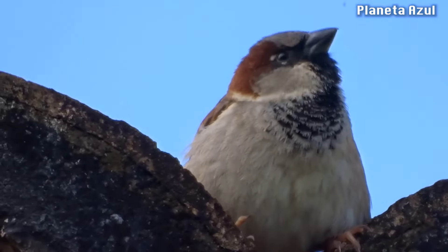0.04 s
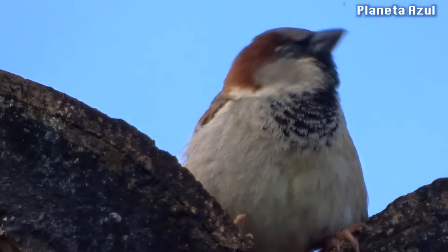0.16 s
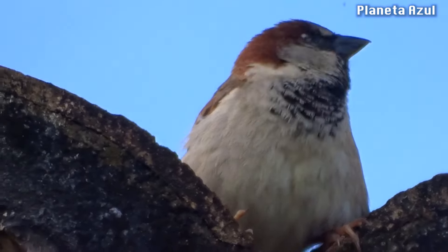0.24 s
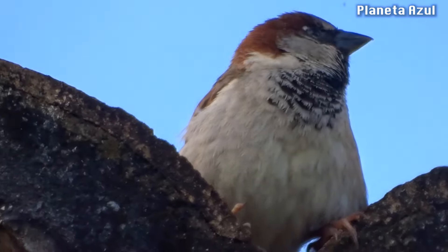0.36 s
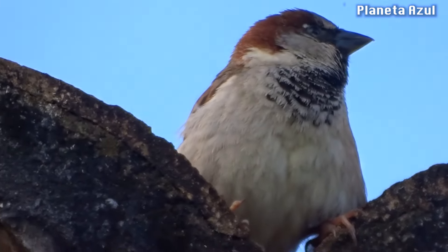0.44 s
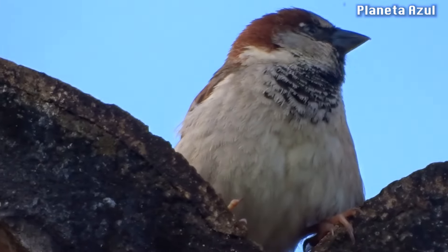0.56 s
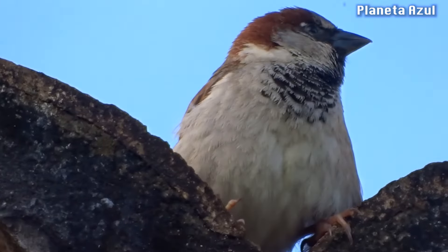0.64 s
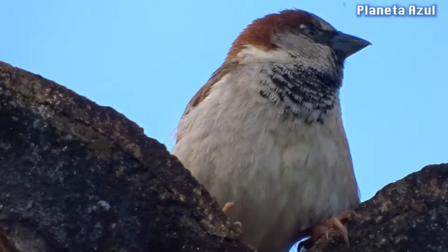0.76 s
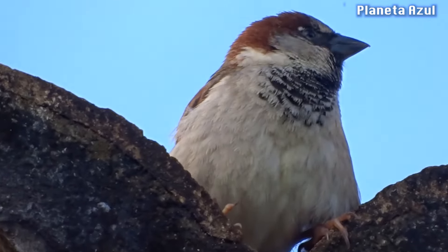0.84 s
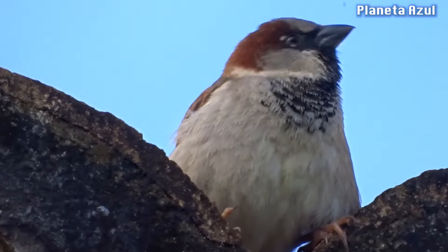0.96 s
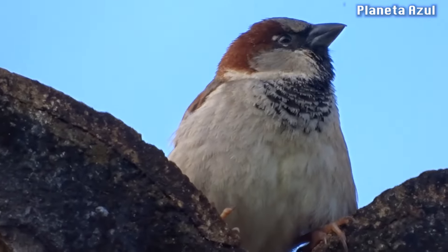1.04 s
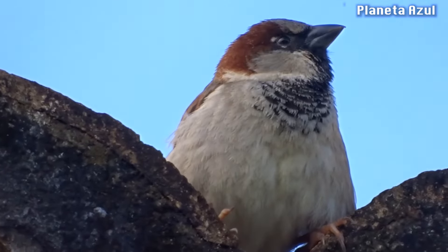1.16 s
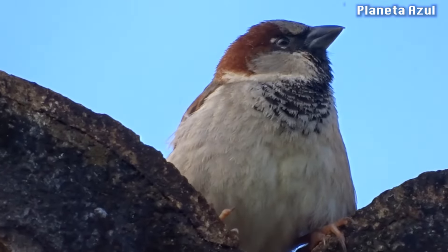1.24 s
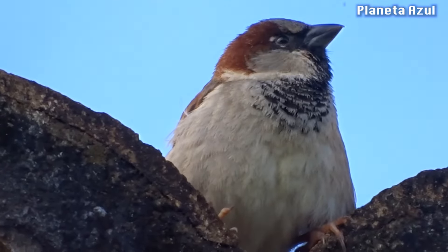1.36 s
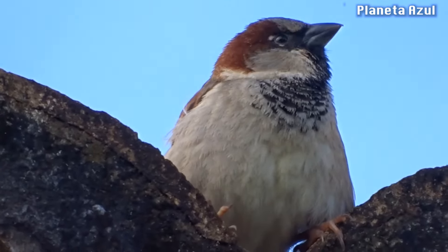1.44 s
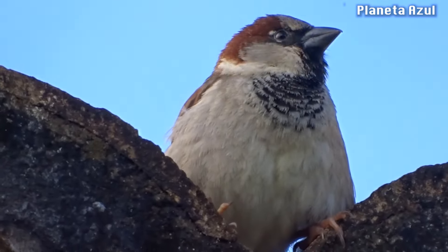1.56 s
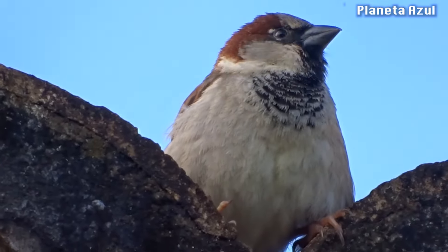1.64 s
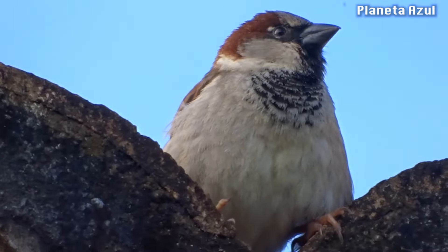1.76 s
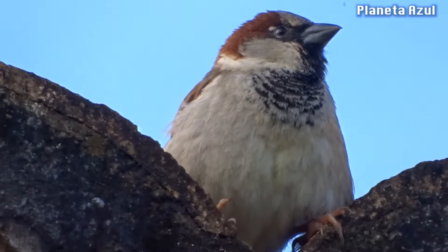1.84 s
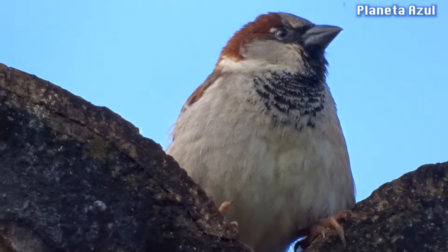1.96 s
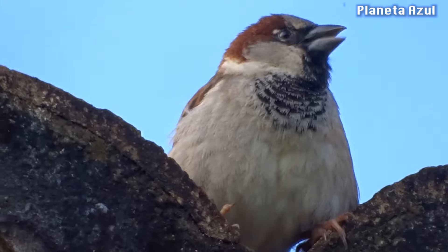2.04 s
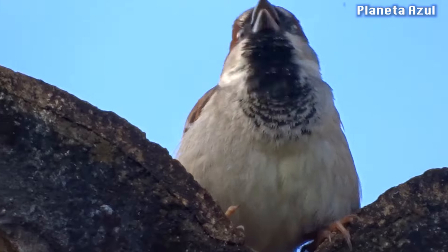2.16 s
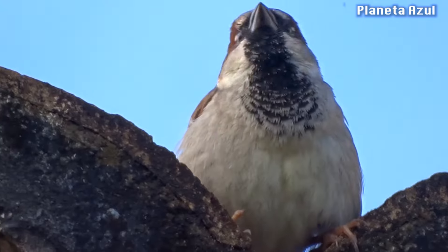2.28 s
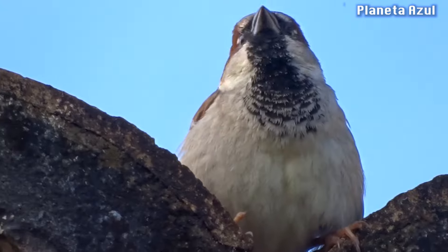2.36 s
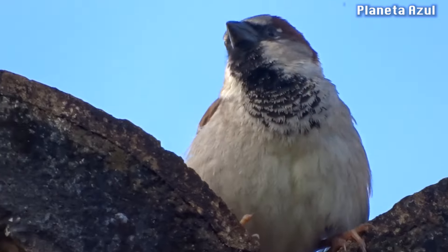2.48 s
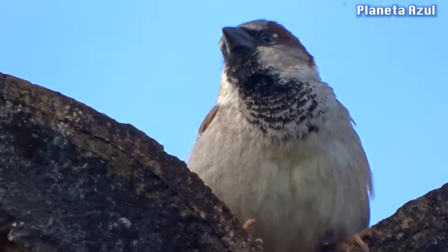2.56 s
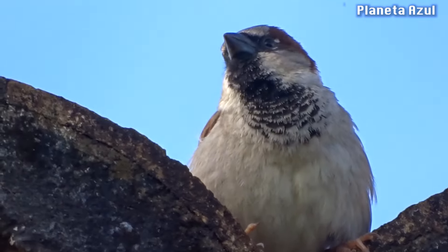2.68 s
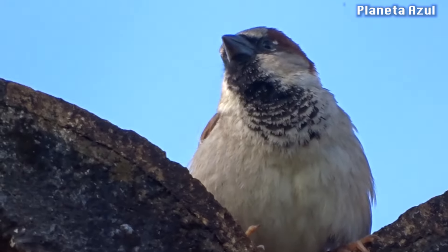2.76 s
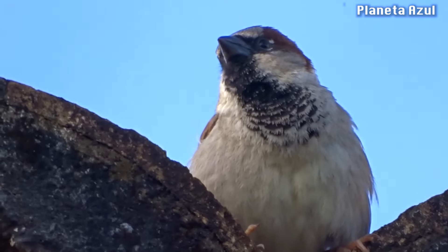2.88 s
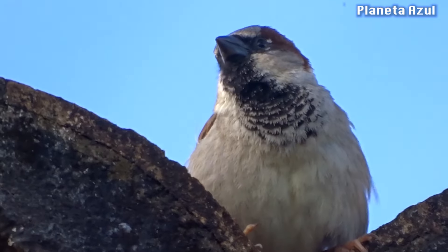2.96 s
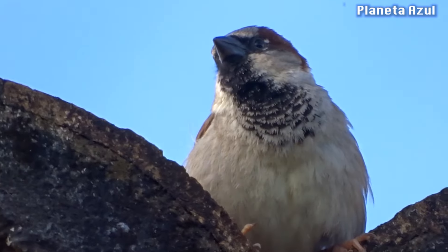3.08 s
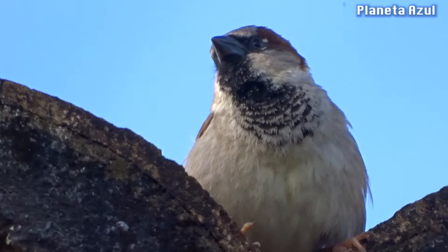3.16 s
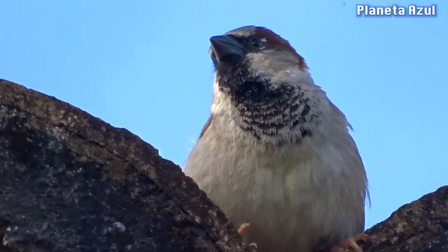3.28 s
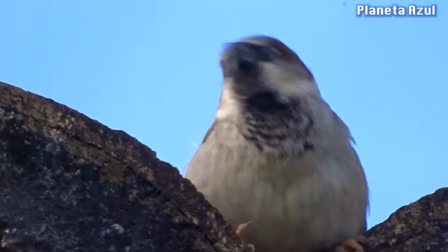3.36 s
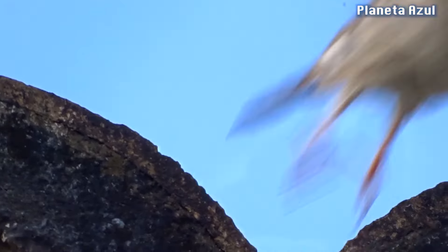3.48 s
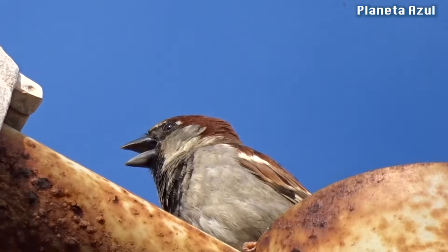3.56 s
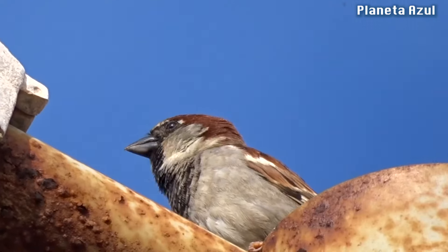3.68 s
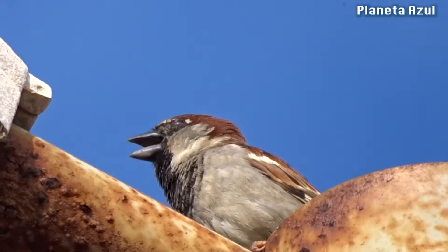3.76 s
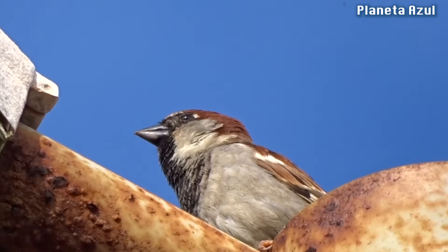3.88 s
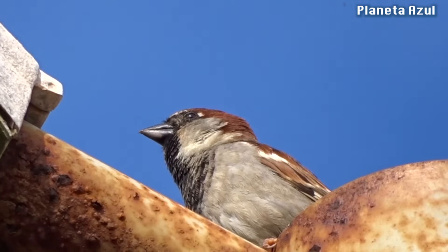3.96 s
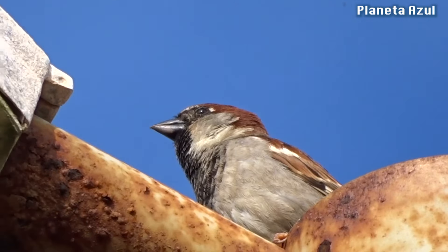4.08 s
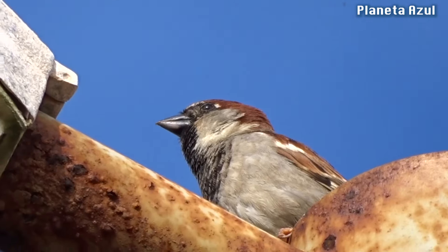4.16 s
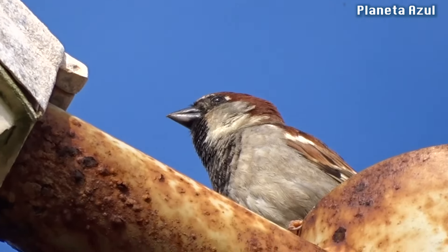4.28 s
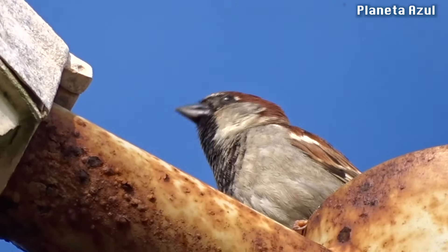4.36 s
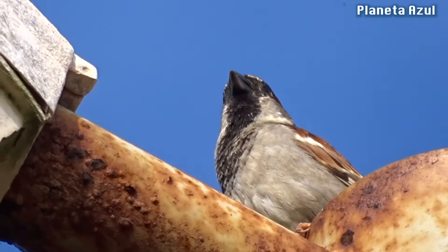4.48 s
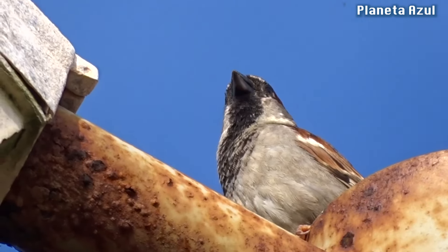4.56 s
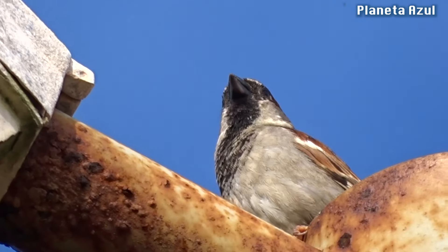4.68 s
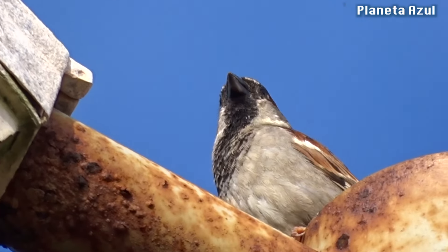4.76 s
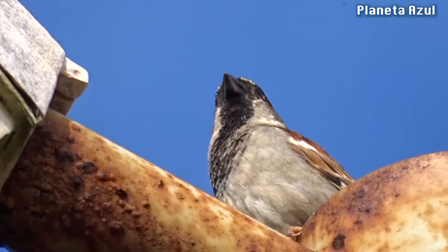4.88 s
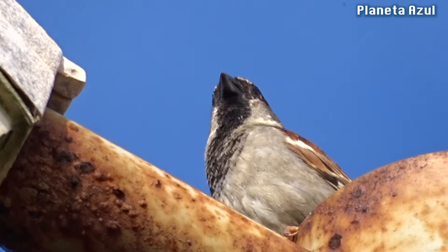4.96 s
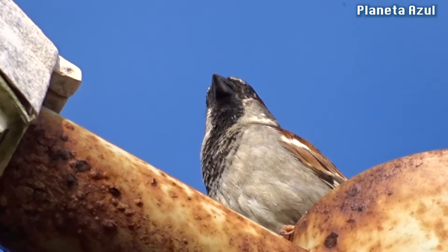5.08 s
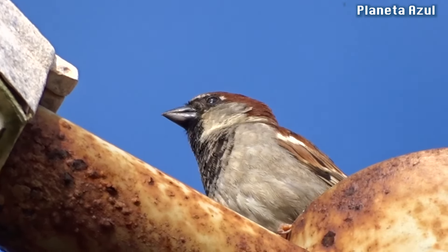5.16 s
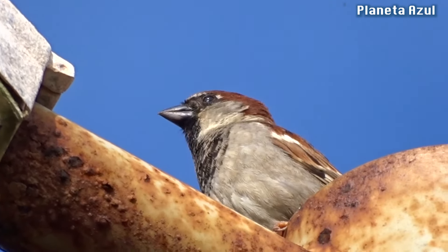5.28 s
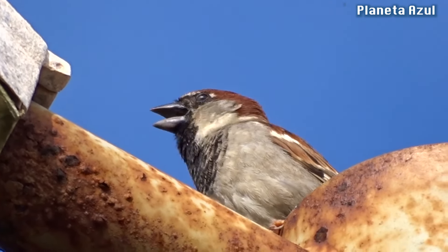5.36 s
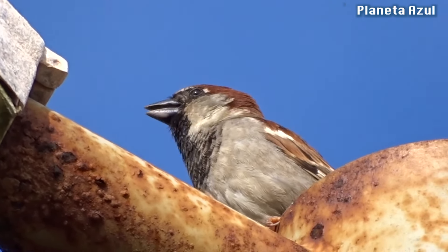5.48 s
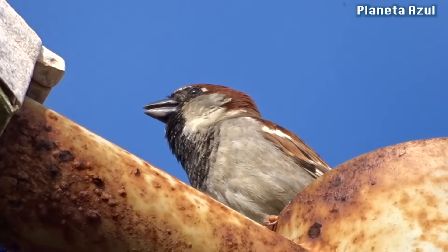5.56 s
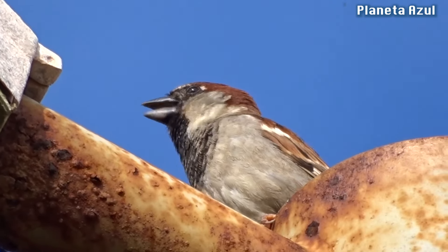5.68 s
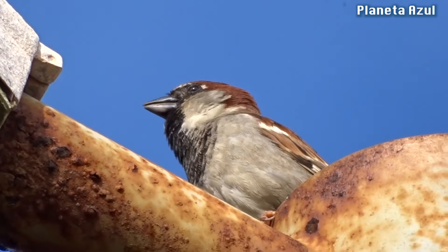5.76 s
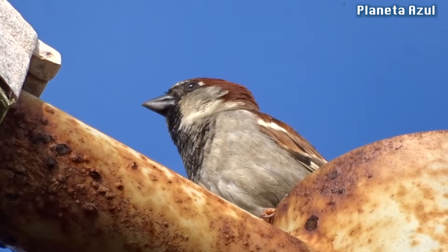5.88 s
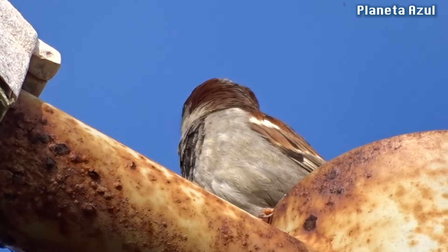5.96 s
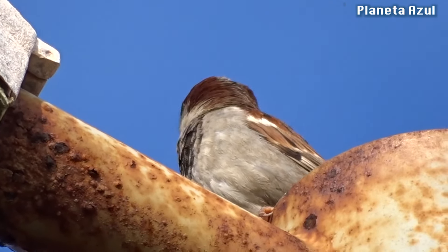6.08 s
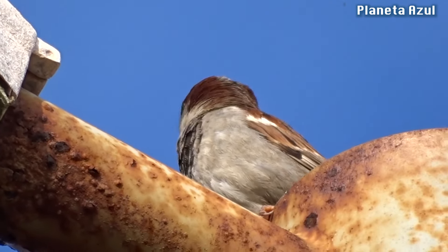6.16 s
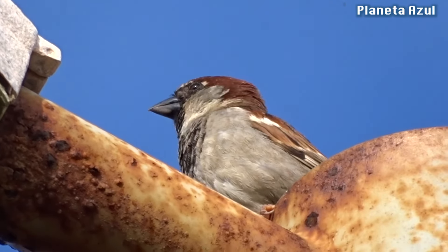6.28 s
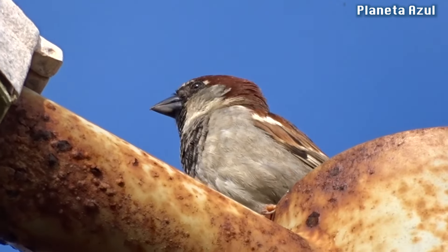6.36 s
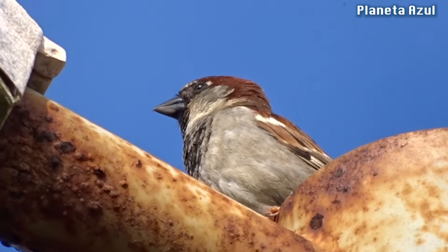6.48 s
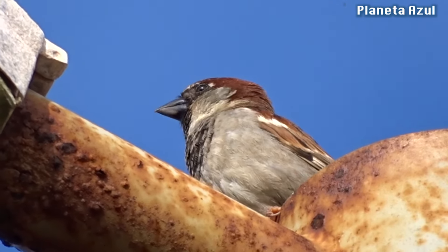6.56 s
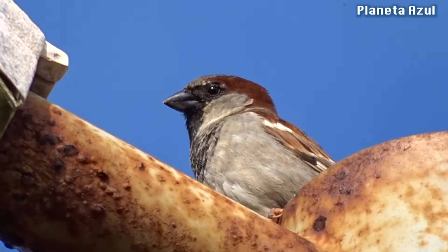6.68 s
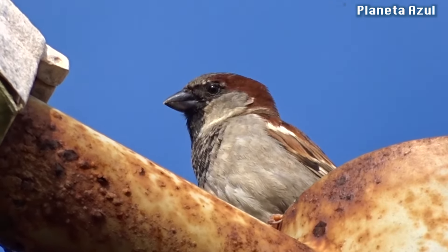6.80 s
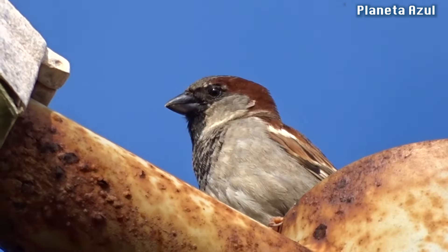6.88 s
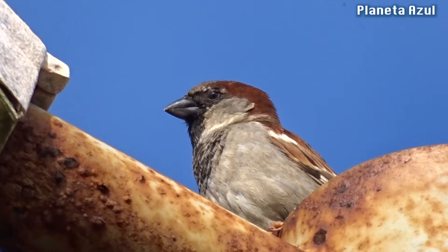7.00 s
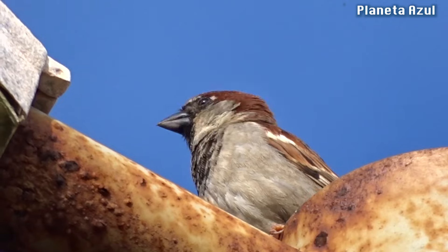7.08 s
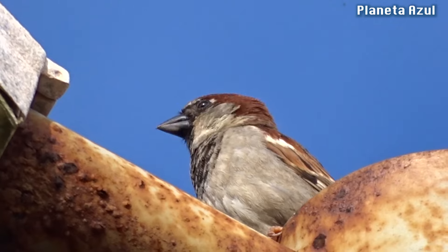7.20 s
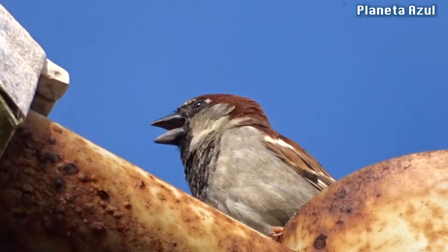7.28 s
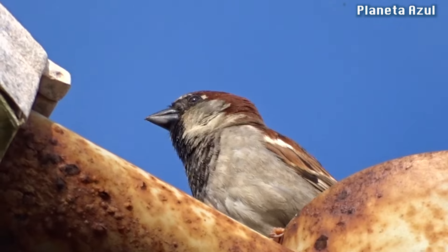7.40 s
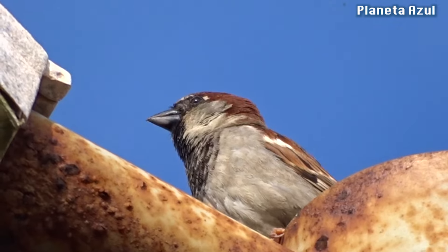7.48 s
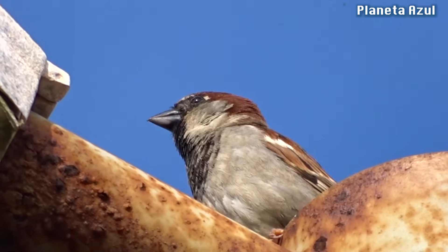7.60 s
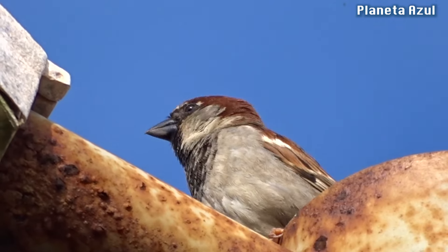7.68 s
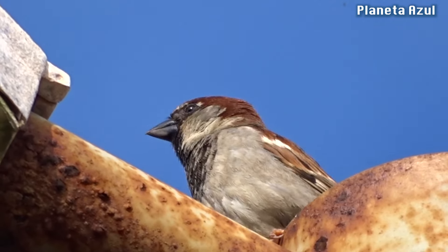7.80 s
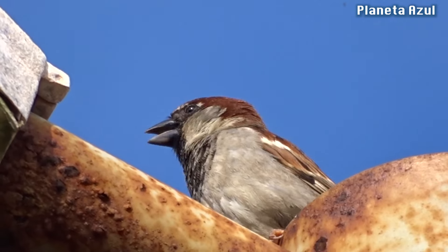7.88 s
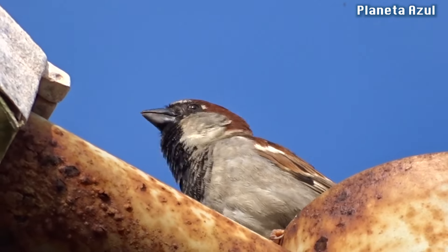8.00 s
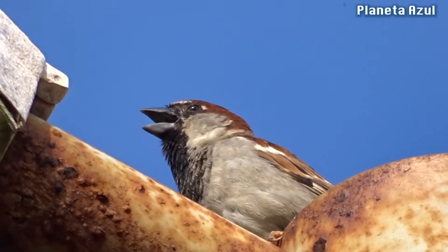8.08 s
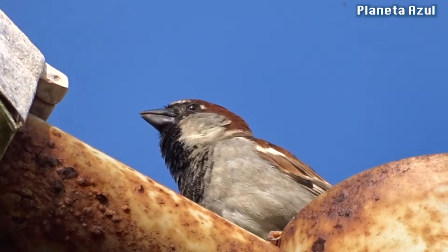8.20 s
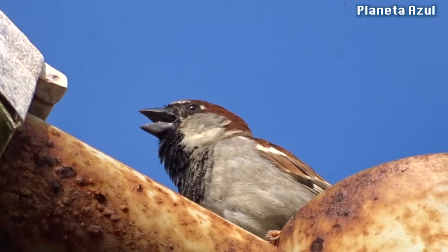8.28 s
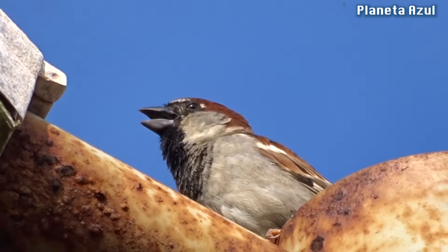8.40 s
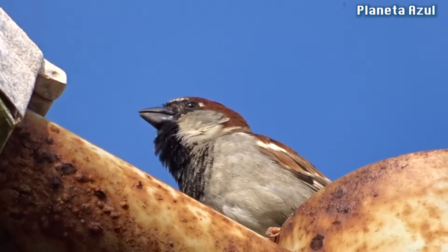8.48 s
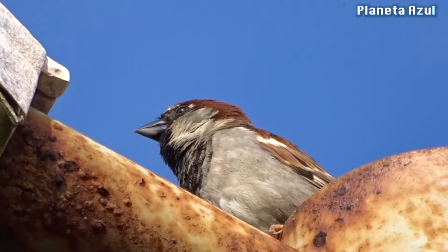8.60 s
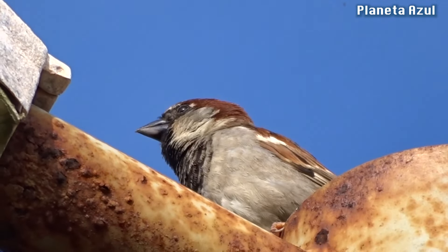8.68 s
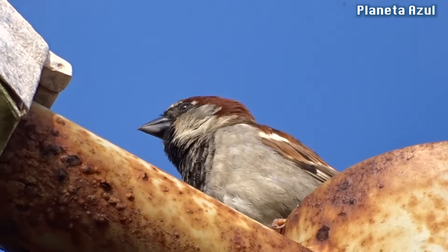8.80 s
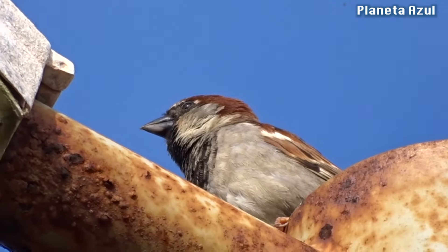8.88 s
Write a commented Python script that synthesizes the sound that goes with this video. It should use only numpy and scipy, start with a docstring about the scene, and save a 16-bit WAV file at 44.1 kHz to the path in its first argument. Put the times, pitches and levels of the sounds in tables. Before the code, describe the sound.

From 0 to 3.5 seconds, a busy sparrow flock calls outdoors among reflecting walls: short, sharp, high chirps, arched slurs and double chirrups over fine treble chatter. Clusters come early, around 1 second, and most loudly near 2.2 seconds, with sparser calls between. Low wind puffs bump the microphone, and distant traffic rumbles softly. At about 3.55 seconds the place abruptly changes to a quieter roof. Two raspy scolds open it while a songbird's fast rising trill smooths into a whistle by 4 seconds. Three pairs of steeply falling whistles follow until 4.8, with a farther two-part chirp at 4, 4.9, 6.1 and 7.8. Three scolds come around 5.4 to 5.8, with strong wind bumps. After a sparse pause, a scold at 7.3, a swelling, breaking warble from 7.5 to 7.9, then rapid scolds, a falling trill and nasal notes to the end near 8.9.

```python
"""A busy sparrow flock calls among echoing walls; at 3.55 s the scene changes to a quieter roof. There sparrows
scold, a farther one repeats a chirp, and a second songbird whistles and trills. Calls are gliding near-sines
with weak overtones and breath noise; scolds are sums of overtones. Traffic and a far flock are banded noise,
wind on the microphone is low noise, echoes are decaying noise."""
import sys
import numpy as np
from scipy import signal
from scipy.fft import rfft, irfft
from scipy.io import wavfile
from scipy.ndimage import uniform_filter1d

SR = 44100
rng = np.random.default_rng(int(sys.argv[2]) if len(sys.argv) > 2 else 0)


def master(y):
    """Save y as 16-bit WAV."""
    cut = np.clip(np.atleast_2d(y).T, -1, 1)
    pcm = np.round(cut * 32767)  # scale
    wavfile.write(sys.argv[1], SR, pcm.astype(np.int16))


N = 394254


def amp(db):
    """Gain of a level in dB."""
    return 10 ** (np.asarray(db) / 20)


def rms_one(x):
    """Signal scaled to rms 1."""
    return x / np.sqrt(np.mean(x ** 2) + 1e-20)


def in_time(rows):
    """A (time_s, value) curve at every sample."""
    return np.interp(np.arange(N) / SR, *np.transpose(rows))


def at_hz(points, hz):
    """A (freq_hz, value) curve read on a log-frequency axis."""
    point_hz, value = np.array(points)[:, 0], np.array(points)[:, 1]
    return np.interp(np.log(hz), np.log(point_hz), value)


def drift(rate_hz):
    """Slow random curve of rms 1: white noise through two equal one-pole lowpasses."""
    pole = np.exp(-2 * np.pi * rate_hz / SR)
    white = rng.standard_normal(N + SR)
    return rms_one(signal.lfilter([1], [1, -2 * pole, pole * pole], white)[SR:])


def panned(x, pan_db):
    """Stereo with a level difference, left minus right in dB."""
    return x * amp(pan_db * np.array([[.5], [-.5]]))


def coloured(x, colour):
    """A sound shaped by a (freq_hz, gain_db) spectrum."""
    return irfft(rfft(x) * amp(at_hz(colour, np.fft.rfftfreq(N, 1 / SR) + 1)), N)


def stereo_pair(mid, side, alike):
    """Two channels of correlation alike, from two independent noises."""
    return np.sqrt(1 + alike) * mid + np.sqrt(1 - alike) * side * np.array([[1], [-1]])


# left-right correlation of background noise: freq_hz, correlation
CORRELATION = [(60, .9), (230, .4), (700, .75), (1700, .5), (3000, .9), (9000, .5)]


def banded_noise(spectrum, patchy_db, rate_hz, pan):
    """Third-octave bands of stereo noise, each with its own level, flicker, correlation and side."""
    out, edges_hz = 0, 25 * 2 ** (np.arange(28) / 3)
    white = rng.standard_normal((2, 2, N))
    for k, (low, high) in enumerate(zip(edges_hz, edges_hz[1:])):
        hz = np.sqrt(low * high)
        if hz < spectrum[0][0]:
            continue
        band = signal.butter(2, [low, high], "band", fs=SR, output="sos")
        mid, side = signal.sosfilt(band, white[k % 2])
        pair = stereo_pair(mid, side, np.clip(at_hz(CORRELATION, hz), -1, 1))
        gain = amp(at_hz(spectrum, hz) + patchy_db * drift(rate_hz))
        out = out + gain * panned(pair, at_hz(pan, hz))
    return rms_one(out)


# traffic spectrum: freq_hz, relative density_db (per Hz)
TRAFFIC_COLOUR = [(25, -18), (90, -3.5), (260, 0.5), (750, -6.5), (1060, -11.5), (1330, -3.5), (1600, -30),
                  (1900, -19), (3800, -19), (6100, -17.5), (11000, -67)]
# traffic side: freq_hz, left_minus_right_db
TRAFFIC_SIDE = [(600, 0.4), (1100, 4), (2000, 1.3), (7000, -3)]
TRAFFIC_DB = -34.5


def traffic():
    """Distant traffic: mostly low banded noise with slow level drift."""
    return amp(TRAFFIC_DB) * banded_noise(TRAFFIC_COLOUR, patchy_db=1.5, rate_hz=0.88, pan=TRAFFIC_SIDE)


# far-flock level: time_s, level_db
BABBLE_LEVEL = [(0.0, -39), (2.09, -43), (5.83, -42.5), (7.07, -53), (8.39, -35), (8.94, -54)]
# far-flock spectrum: freq_hz, relative density_db (per Hz)
BABBLE_SPECTRUM = [(2000, -58), (3000, 15), (4200, 8), (5500, -3), (8000, -2.5), (11000, -5)]


def babble():
    """Far flock blurred to treble noise whose bands flicker."""
    side = [(1000, -2.0), (9000, -1.0)]  # freq_hz, left_minus_right_db
    return amp(in_time(BABBLE_LEVEL)) * banded_noise(BABBLE_SPECTRUM, patchy_db=2.5, rate_hz=18.0, pan=side)


# gusts on the microphone: peak_s, level_db, half_length_s (to 1/e)
WIND_GUSTS = [(0.054, -25, 0.051), (1.994, -27, 0.018), (2.237, -23.5, 0.04), (2.88, -29, 0.043),
              (3.126, -26, 0.02), (5.441, -22, 0.029), (5.563, -22, 0.061), (6.394, -25, 0.011)]
# steady breeze: time_s, level_db
BREEZE_LEVEL = [(0, -46.5), (1.3, -36.5), (3.5, -34.5), (3.6, -85), (4.7, -38), (6.3, -39.5), (6.5, -70),
                (8.94, -46)]


def wind():
    """Lumpy low turbulence on the microphone, mostly shared by both sides; gusts reach higher."""
    t = np.arange(N) / SR
    white = rng.standard_normal((2, N))
    white = white[0] + .28 * white[1] * [[1], [-1]]
    breeze_band = signal.butter(2, [22, 110], "band", fs=SR, output="sos")
    gust_band = signal.butter(2, [60, 330], "band", fs=SR, output="sos")
    breeze = rms_one(signal.sosfilt(breeze_band, white))
    gust = rms_one(signal.sosfilt(gust_band, breeze + 7 * white))
    puffs = sum(amp(level_db) * np.exp(-((t - peak_s) / half_s) ** 2)
                for peak_s, level_db, half_s in WIND_GUSTS)
    lumps = amp(4 * drift(14))
    return lumps * (amp(in_time(BREEZE_LEVEL)) * breeze + puffs * gust)


def walls(x, early_t60_s, late_t60_s, late_db, alike, gap_s):
    """Dense echoes off tiles and walls: a soft onset, a quick bright cluster and a long dull tail."""
    t = np.arange(int(1.2 * SR)) / SR
    mid, side = rng.standard_normal((2, len(t)))
    noise = stereo_pair(mid, side, np.clip(alike, 0, 1))
    dull = signal.sosfilt(signal.butter(2, 6000, fs=SR, output="sos"), noise)
    early = noise * amp(-60 * t / early_t60_s)
    late = dull * amp(late_db - 60 * t / late_t60_s)
    response = (early + late) * np.clip(t / gap_s, 0, 1) ** 2
    response = response / np.sqrt(np.sum(response ** 2) / 2)
    # moving air makes the paths waver by a few samples
    x = np.interp(np.arange(N) + 1.9 * drift(25), np.arange(N), x)
    return signal.fftconvolve(x[None], response, axes=1)[:, :N]


# hiss in a chirp: freq_hz, gain_db
BREATH_SPECTRUM = [(2000, -25), (3000, -2.5), (5000, 11.5), (7000, 13), (11000, -17)]


def whistles(notes, overtones_db, fade_s, rough, jitter, breath_db):
    """Near-sine notes glide along their pitch, with soft ends, flutter, weak overtones and breath."""
    out = np.zeros(N)
    flutter, wobble = 1 + rough * drift(370), 1 + jitter * drift(250)
    breath = amp(breath_db) * rms_one(coloured(rng.standard_normal(N), BREATH_SPECTRUM))
    for note in notes:
        time_s, hz, level_db = np.transpose(note)
        at = np.arange(int((time_s[0] - fade_s) * SR), min(int((time_s[-1] + fade_s) * SR), N))
        t = at / SR
        fade = np.clip(np.minimum(t - t[0], t[-1] - t) / (2 * fade_s), 0, 1)
        # the syrinx rounds the corners of a glide
        pitch = uniform_filter1d(np.interp(t, time_s, hz), size=90) * wobble[at]
        phase = 2 * np.pi * np.cumsum(pitch) / SR
        tone = np.sin(phase) + breath[at]
        for k, below_db in enumerate(overtones_db, start=2):
            # the throat passes only the high overtones
            open_beak = 1 / (1 + (6750 / (k * pitch)) ** 12)
            below_limit = k * pitch < .45 * SR
            tone += amp(below_db) * open_beak * np.sin(k * phase) * below_limit
        envelope = np.sqrt(2) * amp(np.interp(t, time_s, level_db)) * np.sin(np.pi / 2 * fade) ** 2
        out[at] += envelope * tone * flutter[at]
    return out


# far sparrow's calls: start_s, level_db, pitch_factor
FAR_CALLS = [(3.953, -22, 0.99), (4.87, -21.5, 1.04), (6.106, -23.5, 1.03), (7.833, -21, 0.99)]
# notes of one call, each a list of: after_start_s, pitch_hz (before the factor), level_db (re call)
FAR_CALL_NOTES = [
    [(0, 4194, -6), (.01, 5060, -10), (.08, 4990, -8)],
    [(.005, 4630, -4), (.085, 4775, -25.5)],
    [(.095, 3400, -10), (.12, 4294, -10.5), (.145, 3420, -27)],
]


def far_sparrow():
    """A farther sparrow repeats one two-part chirp, two-voiced at first, transposed at each call."""
    notes = [np.multiply(note, [1, factor, 1]) + [start_s, 0, level_db]
             for start_s, level_db, factor in FAR_CALLS for note in FAR_CALL_NOTES]
    return whistles(notes, [], fade_s=.005, rough=.25, jitter=.016, breath_db=-18)


# nasal notes: start_s, length_s, top_hz, level_db
NASAL_ARCHES = [(8.361, 0.0627, 2383, -9.5), (8.852, 0.056, 2236, -16.5)]
# overtones 2, 3, ..: level_db (re note, before the throat damps them)
NASAL_OVERTONES = [0, -15, -33, -27]
NASAL_CLIMB_SHARE, NASAL_FALL_SHARE, NASAL_TOP_AT = 0.19, 0.24, 0.317  # shares of top_hz, of length_s
NASAL_START_DB, NASAL_END_DB = -24, -18.5


def nasal_notes():
    """Low arches that peak early, with a faint high third overtone."""
    notes = [[(s, hz * (1 - NASAL_CLIMB_SHARE), db + NASAL_START_DB),
              (s + NASAL_TOP_AT * length_s, hz, db),
              (s + length_s, hz * (1 - NASAL_FALL_SHARE), db + NASAL_END_DB)]
             for s, length_s, hz, db in NASAL_ARCHES]
    return whistles(notes, NASAL_OVERTONES, fade_s=.005, rough=.12, jitter=.002, breath_db=-28)


# trill outlines, each a list of: time_s, pitch_hz, level_db
TRILL_OUTLINES = [
    [(3.72, 1554, -30.5), (3.77, 1874, -26.5), (3.82, 2110, -21.5), (3.88, 2303, -19.5), (3.93, 2383, -16),
     (3.968, 2475, -14.5), (4.05, 2426, -13), (4.06, 2440, -39)],
    [(8.09, 2900, -29), (8.1, 3957, -34), (8.11, 3290, -19), (8.17, 3054, -12), (8.23, 2714, -14)],
]
# beat: pulses_hz, pulse_phase_reference_s, pitch_swing_share, pitch_lead_rad, plain_whistle_from_s
TRILL_PULSES = [(65.3, 4.6, 0.058, 0.5, 3.96), (71.3, 8.125, 0.056, 4.5, 8.22)]


def trills(pulse_depth):
    """Whistles whose pitch and level beat quickly, until they merge into a steady tone."""
    out = np.zeros(N)
    for note, (beat_hz, reference_s, swing, lead_rad, steady_s) in zip(TRILL_OUTLINES, TRILL_PULSES):
        time_s, hz, level_db = np.transpose(note)
        at = np.arange(int(time_s[0] * SR), int(time_s[-1] * SR))
        t = at / SR
        depth = np.clip((steady_s - t) / 0.086, 0, 1)
        cycle = 2 * np.pi * beat_hz * (t - reference_s)
        pitch = np.interp(t, time_s, hz) * (1 + swing * depth * np.cos(cycle + lead_rad))
        fade = np.clip(np.minimum(t - t[0], t[-1] - t) / 0.0067, 0, 1)
        phase = 2 * np.pi * np.cumsum(pitch) / SR
        tone = np.sin(phase) + amp(-36) * np.sin(3 * phase)
        pulse = 1 + pulse_depth * depth * np.cos(cycle)
        out[at] = np.sqrt(2) * amp(np.interp(t, time_s, level_db)) * pulse * fade * tone
    return out


STRIKE_HZ, KNEE_HZ = (5140, 5500), (3716, 3430)  # first and second note of a couplet
STRIKE_DB, DROP_S = -18.5, 0.016
DROP_EARLY_SHARE, SAG_EARLY_SHARE, SAG_END_DB = .75, 0.81, -2


def drop(start_s, end_s, strike_hz, knee_hz, last_hz, db):
    """A steep fall to the knee, then a sag; each is mostly done halfway."""
    knee_s = start_s + DROP_S
    mid_drop_hz = strike_hz + DROP_EARLY_SHARE * (knee_hz - strike_hz)
    mid_sag_hz = knee_hz + SAG_EARLY_SHARE * (last_hz - knee_hz)
    return [(start_s, strike_hz, db + STRIKE_DB),
            (start_s + DROP_S / 2, mid_drop_hz, db + STRIKE_DB / 2),
            (knee_s, knee_hz, db),
            ((knee_s + end_s) / 2, mid_sag_hz, db),
            (end_s, last_hz, db + SAG_END_DB)]


# note pairs: start_s, first_length_s, second_after_s, first_last_hz, second_last_hz, level_db
SONG_COUPLETS = [(4.23, 0.061, 0.07, 3490, 3000, -9.5), (4.457, .074, 0.076, 3210, 2845, -11.5),
                 (4.692, 0.0787, .081, 3360, 2960, -10)]
PICKUP_HZ, PICKUP_S, PICKUP_DB = 3404, 0.00463, -24
SECOND_NOTE_S = 0.0461


def couplets():
    """Outlines of two-note figures; each note drops steeply, then sags."""
    notes = []
    for s, length_s, after_s, first_hz, second_hz, db in SONG_COUPLETS:
        pickup = [(s, PICKUP_HZ, db + PICKUP_DB)]
        notes.append(pickup + drop(s + PICKUP_S, s + length_s, STRIKE_HZ[0], KNEE_HZ[0], first_hz, db))
        second_s = s + after_s
        notes.append(drop(second_s, second_s + SECOND_NOTE_S, STRIKE_HZ[1], KNEE_HZ[1], second_hz, db))
    return notes


# warble: break_s, climb_s, climb_top_hz, climb_db, fall_top_hz, fall_db
WARBLE_BREAKS = [(7.49, 0.017, 2530, -14.5, 3270, -9), (7.588, 0.018, 2690, -6.5, 3020, -9.5),
                 (7.679, 0.018, 2430, -7, 2810, -9), (7.768, 0.022, 2416, -8, 2956, -10),
                 (7.891, 0.039, 2164, -17.5, 2686, -12)]
WARBLE_CLIMB_SHARE, WARBLE_SWELL_DB, WARBLE_BREAK_S = 0.197, 24.5, 0.0021
WARBLE_FALL_HZ_PER_S, WARBLE_LOW_HZ = 25000, 1990
WARBLE_FALL_START_DB, WARBLE_FALL_END_DB = -7, -24


def warble():
    """Outlines of swelling climbs that each break into a higher falling note."""
    notes = []
    for s, climb_s, climb_hz, climb_db, fall_hz, fall_db in WARBLE_BREAKS:
        notes.append([
            (s - climb_s, climb_hz * (1 - WARBLE_CLIMB_SHARE), climb_db - WARBLE_SWELL_DB),
            (s - climb_s / 2, climb_hz * (1 - WARBLE_CLIMB_SHARE / 4), climb_db - WARBLE_SWELL_DB / 4),
            (s - WARBLE_BREAK_S, climb_hz, climb_db)])
        fall_s = (fall_hz - WARBLE_LOW_HZ) / WARBLE_FALL_HZ_PER_S
        notes.append([
            (s, fall_hz, fall_db + WARBLE_FALL_START_DB),
            (s + fall_s / 2, (fall_hz + WARBLE_LOW_HZ) / 2, fall_db),
            (s + fall_s, WARBLE_LOW_HZ, fall_db + WARBLE_FALL_END_DB)])
    return notes


# single notes, and at 8.848 s the second overtone of a nasal note;
# each a list of: time_s, pitch_hz, level_db
SONG_OUTLINES = [
    [(3.668, 1940, -26), (3.683, 3410, -16), (3.697, 2320, -14.5), (3.72, 1550, -47)],
    [(8.555, 5640, -48), (8.57, 3734, -11), (8.6, 3050, -8), (8.63, 2560, -14), (8.655, 3136, -13),
     (8.71, 3260, -23.5)],
    [(8.805, 4050, -39), (8.84, 3040, -25)],
    [(8.848, 3120, -42), (8.871, 4420, -26.5), (8.895, 3600, -34)],
    [(6.427, 2270, -46), (6.46, 2080, -47)],
]
# overtones 2, 3: level_db (re note, before the throat damps them)
SONG_OVERTONES = [-16.5, -36]


def songbird():
    """Second songbird: whistled outlines, couplets and warble, plus trills and nasal notes."""
    notes = list(SONG_OUTLINES) + couplets() + warble()
    song = whistles(notes, SONG_OVERTONES, fade_s=.004, rough=.07, jitter=.002, breath_db=-35)
    return song + trills(pulse_depth=.65) + nasal_notes()


# scold calls: start_s, level_db
SCOLD_CALLS = [(3.607, -21), (3.788, -19.5), (5.375, -18.5), (5.549, -18.5), (5.735, -17.5), (7.301, -22.5),
               (7.943, -21), (8.118, -16.5), (8.286, -17), (8.456, -18)]
# one scold: after_start_s, pitch_hz (before detune), throat_resonance_hz, level_db (re call)
SCOLD_OUTLINE = [(0, 575, 4860, -19.5), (.012, 609.5, 4830, -4.5), (.034, 645, 5150, -7),
                 (.039, 695, 3800, -5), (.058, 720, 3700, 0), (.074, 615, 3050, -6), (0.1, 505, 2450, -10)]
# scold spectrum: freq_hz, gain_db
SCOLD_SPECTRUM = [(1000, -37), (1500, -8), (2150, -7), (2750, -20), (3600, 0), (4400, -5), (7000, -7),
                  (8500, -24), (10300, -15)]


def scolds(throat_width_hz, throat_db, jitter, hiss_db, rasp_db):
    """Hissing overtone buzz; a moving throat resonance lifts it, each overtone breaks up on its own."""
    out, wobble = np.zeros(N), drift(280)
    hiss = rms_one(coloured(rng.standard_normal(N), SCOLD_SPECTRUM))
    time_s, hz, throat_hz, shape_db = np.transpose(SCOLD_OUTLINE)
    t = np.arange(int(time_s[-1] * SR)) / SR
    k = np.arange(2, 19)[:, None]  # overtone numbers
    beak = 1 / (1 + (t / .062) ** 6)  # the closing beak stops the hiss and the high overtones
    breathy, bright = amp(hiss_db) * beak, np.where(k > 7, beak, 1)
    chances = rng.standard_normal((len(SCOLD_CALLS), 2))
    for (start_s, level_db), (detune, turn) in zip(SCOLD_CALLS, chances):
        at = int(start_s * SR) + np.arange(len(t))
        pitch = np.interp(t, time_s, hz) * (1 + 0.0099 * detune + jitter * wobble[at])
        phase = 2 * np.pi * np.cumsum(pitch) / SR
        off_throat_hz = k * pitch - np.interp(t, time_s, throat_hz)
        lift_db = throat_db / (1 + (off_throat_hz / throat_width_hz) ** 2)
        rasp = rms_one(uniform_filter1d(rng.standard_normal((len(k), len(t))), size=260))
        gain = amp(at_hz(SCOLD_SPECTRUM, k * pitch) + lift_db + rasp_db * rasp) * bright
        buzz = np.sum(gain * np.sin(k * phase + turn * k * k), axis=0)
        out[at] += amp(level_db + np.interp(t, time_s, shape_db)) * (rms_one(buzz) + breathy * hiss[at])
    return out


SCENE_CHANGE_S = 3.55
# overtone 2: level_db (re note, before the throat damps it)
FLOCK_OVERTONES = [-21]


def flock_chatter(level_db, spread_db):
    """The rest of the flock: short arched or falling slurs at random moments and pitches."""
    start, height, slope, size, loud = rng.random((45, 5)).T
    starts_s, tops_hz = SCENE_CHANGE_S * start + 0.014, 4200 * 1.9 ** height
    lengths_s, levels_db = 0.043 + 0.14 * size, level_db - spread_db * loud
    notes = []
    for s, hz, rise, length_s, db in zip(starts_s, tops_hz, slope, lengths_s, levels_db):
        notes.append([(s, hz * (1 - 0.13 * rise), db + 0.5),
                      (s + 0.29 * length_s, hz, db),
                      (s + length_s, hz * 0.59, db + 1.0)])
    return whistles(notes, FLOCK_OVERTONES, fade_s=0.0046, rough=0.072, jitter=0.0293, breath_db=-8.0)


# quick climb, then level pitch: start_s, climb_s, hold_s, pitch_hz, level_db
FLOCK_HELD = [(0.123, 0.0072, 0.045, 4880, -20.5), (0.273, 0.014, 0.043, 4850, -22.5),
              (0.666, .01, 0.023, 5000, -36), (1.41, 0.023, 0.058, 4690, -41),
              (1.513, 0.013, 0.095, 4950, -29.5), (1.714, 0.0065, 0.042, 4860, -34),
              (3.079, .008, 0.037, 4870, -29), (3.389, 0.015, 0.026, 4264, -28)]
HELD_CLIMB_SHARE, HELD_SOFT_START_DB = 0.22, -2
# arches: start_s, length_s, top_hz, climb_share, fall_share (of top_hz), level_db
FLOCK_ARCHES = [(0.766, 0.028, 4640, .25, 0.36, -25), (0.872, 0.071, 3610, .15, 0.23, -19.5),
                (0.985, 0.037, 4670, .12, 0.27, -15), (1.039, 0.04, 4095, 0.25, 0.3, -14.5),
                (1.62, 0.024, 3880, 0.18, 0.048, -21), (1.764, 0.032, 4530, 0.12, 0.26, -28.5),
                (2.315, 0.051, 4990, 0.19, 0.33, -12.5), (2.373, 0.046, 4225, .2, 0.31, -15.5),
                (3.122, 0.029, 4340, 0.18, 0.23, -25.5), (2.463, 0.025, 4280, 0.3, 0.26, -22),
                (3.299, .06, 5880, 0.12, 0.26, -25)]
ARCH_TOP_AT, ARCH_START_DB, ARCH_END_DB = 0.41, -11, -3.5  # top as share of length_s
# straight slides: start_s, length_s, from_hz, to_hz, level_db, swell_db
FLOCK_SLIDES = [(0.224, 0.018, 3390, 3490, -32, 2), (0.25, 0.019, 5700, 7250, -31.5, 6),
                (0.34, 0.0078, 4920, 4284, -13, 12), (0.344, 0.0394, 4190, 3880, -21, -14),
                (0.348, .025, 3900, 2930, -29.5, -7), (0.701, 0.021, 3670, 3960, -32.5, 7),
                (0.75, 0.037, 2840, 3250, -34, 2), (0.783, 0.028, 3420, 2730, -30.5, 16),
                (1.005, 0.037, 2940, 2620, -30, 1), (1.113, 0.023, 3140, 3490, -25.5, 10),
                (1.145, 0.011, 3640, 3260, -24.5, -24), (1.175, 0.049, 7700, 5670, -34, 13),
                (1.525, 0.046, 5650, 5460, -26.5, 2), (1.569, 0.0074, 5040, 3800, -25, -2),
                (1.659, 0.025, 3760, 3770, -35, 9), (1.804, 0.045, 3107, 3046, -34, -3),
                (1.956, 0.035, 6900, 9300, -35, -3), (2.106, 0.0217, 5470, 6250, -17, 4),
                (2.127, 0.013, 6060, 9300, -28, -20), (2.436, 0.029, 4840, 3850, -21.5, -9),
                (2.458, 0.016, 4080, 3970, -18, -6), (2.867, 0.017, 6780, 7120, -31, -2),
                (3.171, 0.066, 3190, 2950, -35.5, -12), (3.297, 0.086, 5120, 4800, -26, -7),
                (3.333, 0.032, 3380, 3230, -35, -2)]
# double-arched chirrups: start_s, level_db
CHIRRUP_CALLS = [(1.976, -18), (2.881, -20.5)]
# one chirrup: after_start_s, pitch_hz, level_db (re call)
CHIRRUP_OUTLINE = [(0, 3540, -6.5), (.017, 5590, -3), (.028, 5190, 4.5), (.04, 5244, 4.5),
                   (.048, 3310, -2.5), (.063, 4850, 2), (.083, 4385, -4.5), (.107, 2920, -6)]
# loudest chirp, a spike and an arch: time_s, pitch_hz, level_db
LOUDEST_CHIRP = [(2.132, 3140, -39), (2.148, 4710, -8.5), (2.157, 5930, -21), (2.165, 4550, -14.5),
                 (2.185, 4370, -7), (2.193, 3223, -16), (2.213, 4236, -10), (2.24, 3084, -14)]


def flock_notes():
    """Held notes, arches, slides, chirrups and the loudest chirp as pitch and level outlines."""
    notes = [[(s, hz * (1 - HELD_CLIMB_SHARE), db + HELD_SOFT_START_DB),
              (s + climb_s, hz, db),
              (s + climb_s + hold_s, hz, db)]
             for s, climb_s, hold_s, hz, db in FLOCK_HELD]
    notes += [[(s, hz * (1 - climb), db + ARCH_START_DB),
               (s + ARCH_TOP_AT * length_s, hz, db),
               (s + length_s, hz * (1 - fall), db + ARCH_END_DB)]
              for s, length_s, hz, climb, fall, db in FLOCK_ARCHES]
    notes += [[(s, from_hz, db - swell_db / 2), (s + length_s, to_hz, db + swell_db / 2)]
              for s, length_s, from_hz, to_hz, db, swell_db in FLOCK_SLIDES]
    notes += [np.add(CHIRRUP_OUTLINE, [s, 0, db]) for s, db in CHIRRUP_CALLS]
    return notes + [LOUDEST_CHIRP]


# side of the calling birds: time_s, left_minus_right_db
FLOCK_SIDE = [(0, 1), (.6, -3.5), (1.3, -2.5), (1.7, -2), (3.55, -1.8)]


def flock():
    """Near sparrows, chatter and their wall echoes, cut off where the scene changes."""
    birds = whistles(flock_notes(), FLOCK_OVERTONES, fade_s=.004, rough=.35, jitter=.013, breath_db=-24)
    birds = birds + flock_chatter(level_db=-40, spread_db=8)
    echoes = walls(birds, early_t60_s=0.061, late_t60_s=0.68, late_db=-14.5, alike=0.96, gap_s=0.01)
    before_change = np.arange(N) < SCENE_CHANGE_S * SR
    return panned(birds + amp(-4.0) * echoes, in_time(FLOCK_SIDE)) * before_change


ROOF_PAN_DB = 0.5  # left minus right


def scene():
    """The flock and its echoes end where the scene changes; the roof birds follow."""
    song, far = songbird(), far_sparrow()
    sparrows = scolds(throat_width_hz=380, throat_db=15, jitter=.006, hiss_db=-13, rasp_db=3.5)
    to_walls = amp(-9.0) * song + sparrows + amp(1.0) * far
    echoes = walls(to_walls, early_t60_s=0.074, late_t60_s=0.9, late_db=-15, alike=1.0, gap_s=0.011)
    roof = panned(song + sparrows + far + echoes, ROOF_PAN_DB)
    return flock() + roof + babble() + traffic() + wind()


# phase between the microphone ports: freq_hz, right_lead_rad
PORT_LEAD = [(60, .3), (500, 1.1), (1200, .7), (3000, .35), (4500, 0)]
CUTOFF_HZ = 11050


def record(dry):
    """The two ports differ in phase and treble, the top is cut steeply, peaks clip at full scale."""
    hz = np.fft.rfftfreq(N, 1 / SR) + 1
    turn = np.exp(.5j * at_hz(PORT_LEAD, hz) * [[-1], [1]])
    shading_db = -3 / (1 + (8300 / hz) ** 10)  # the left port hears less of the top
    ports = irfft(panned(rfft(dry) * turn, shading_db), N)
    lowpass = signal.ellip(12, .5, 70, CUTOFF_HZ, fs=SR, output="sos")
    return np.clip(signal.sosfilt(lowpass, ports), -1, 1)


dry = scene()
out = record(dry)
master(out)
```